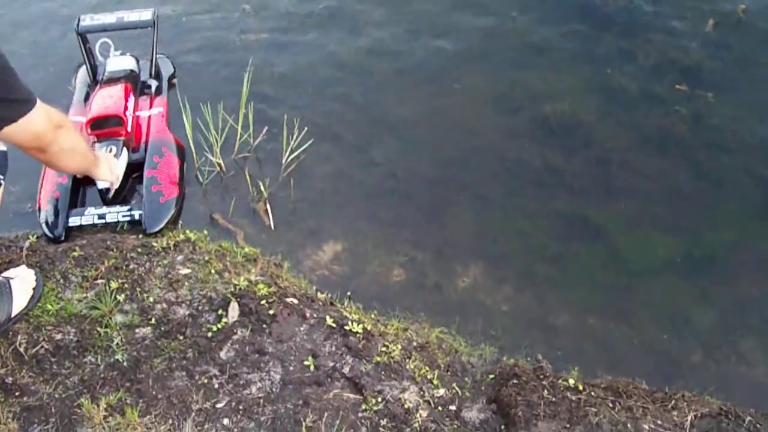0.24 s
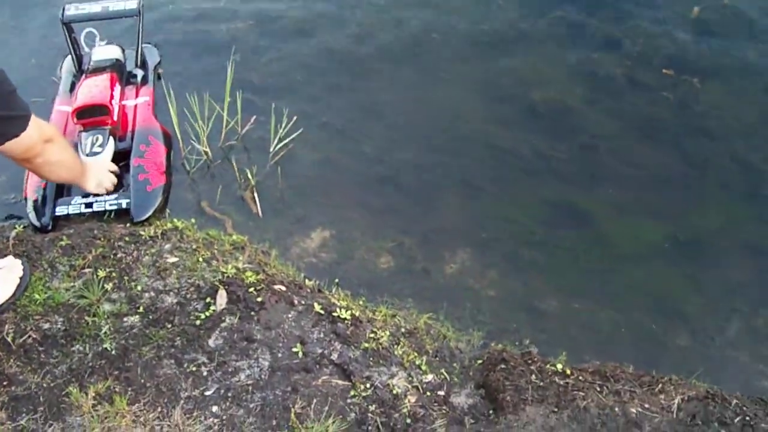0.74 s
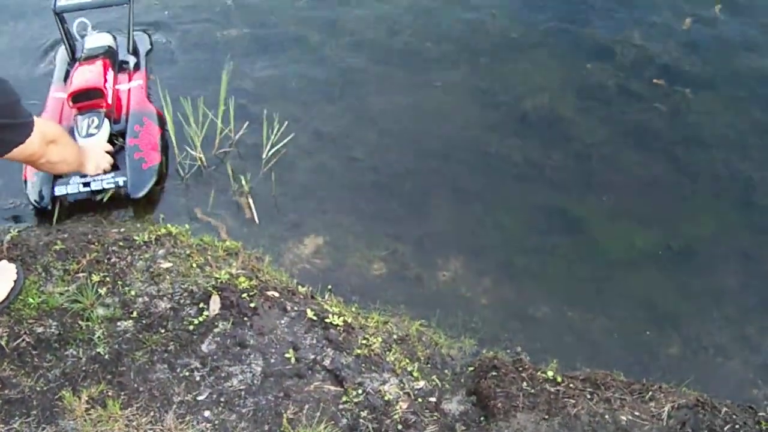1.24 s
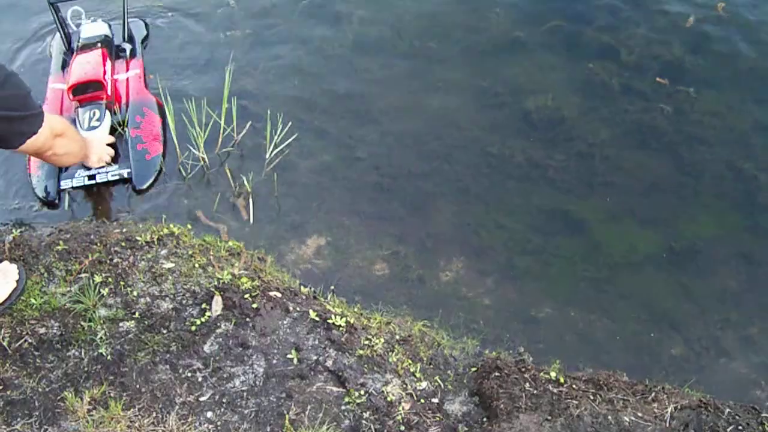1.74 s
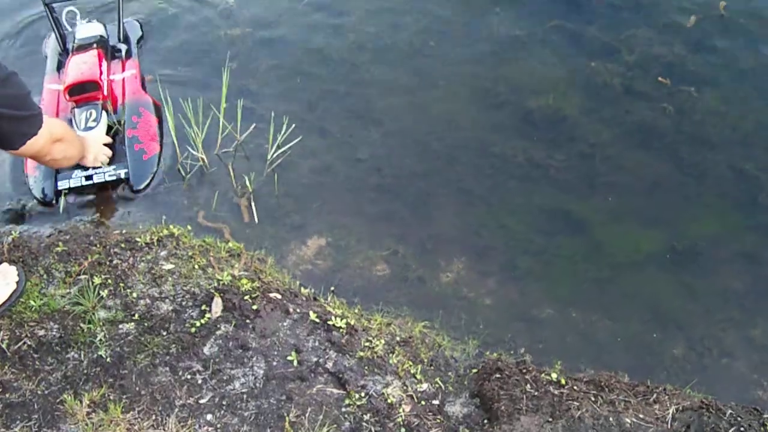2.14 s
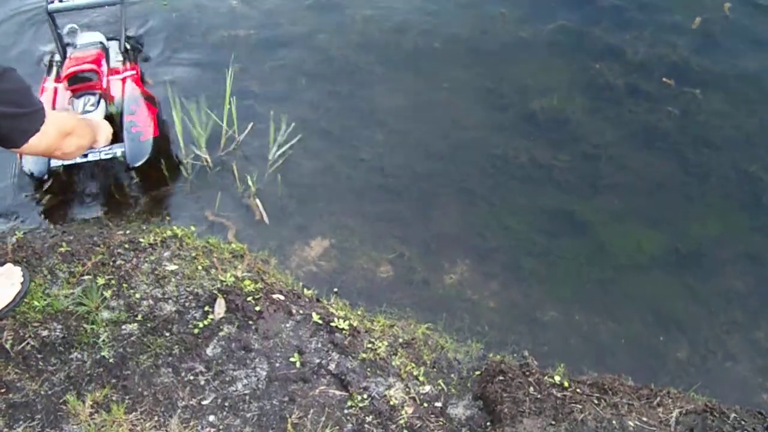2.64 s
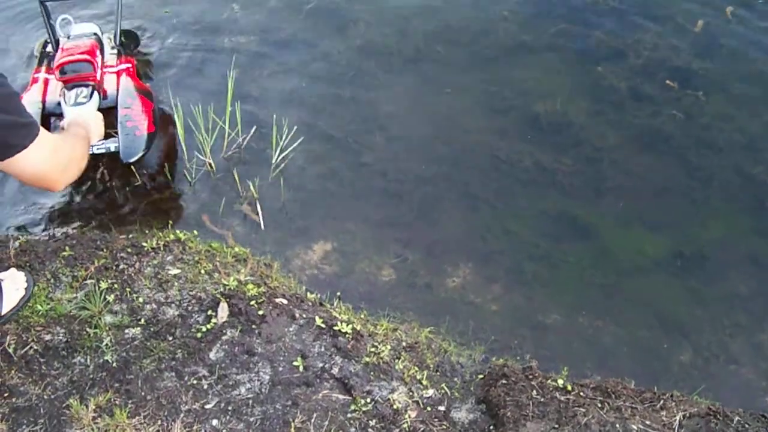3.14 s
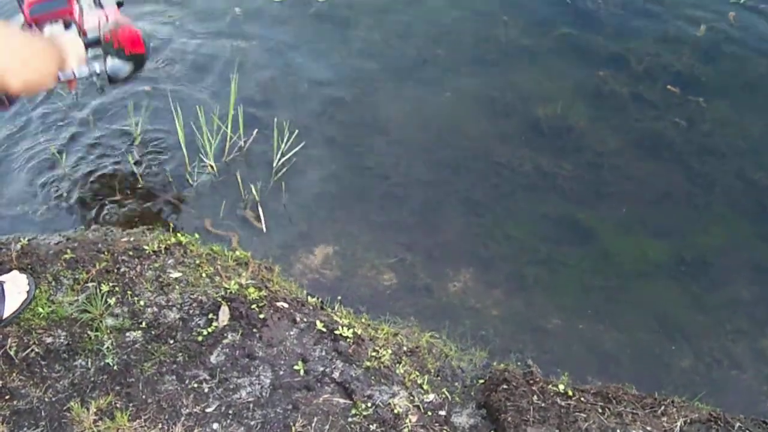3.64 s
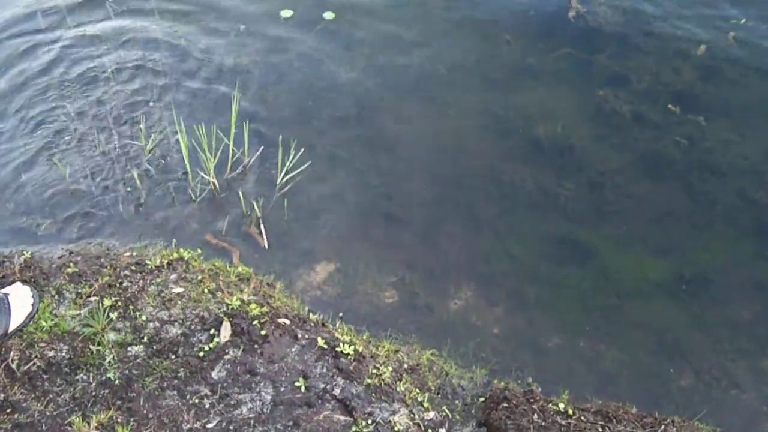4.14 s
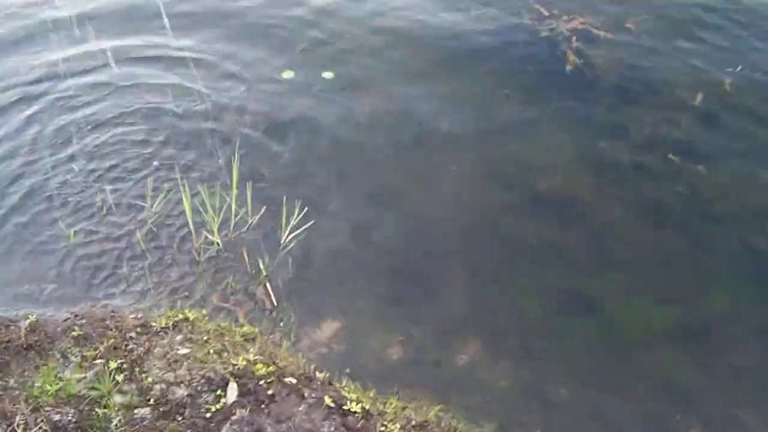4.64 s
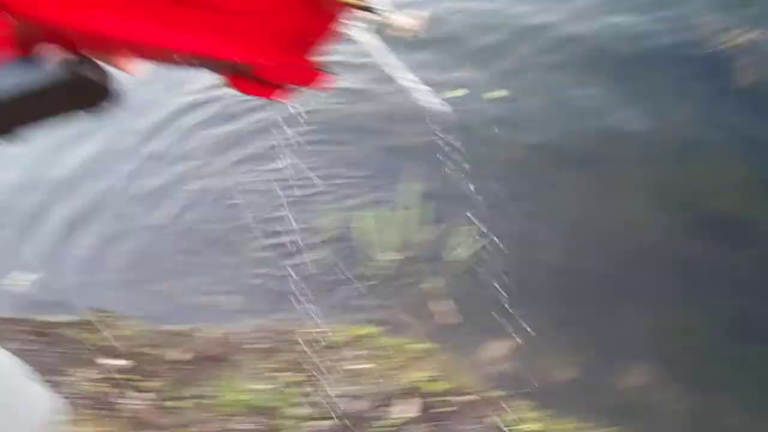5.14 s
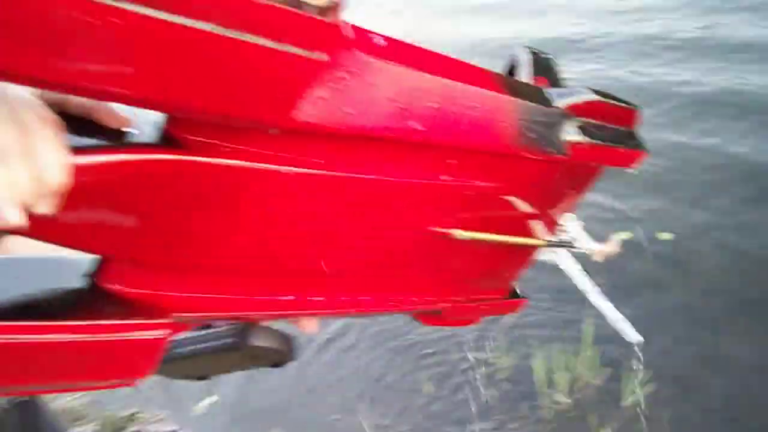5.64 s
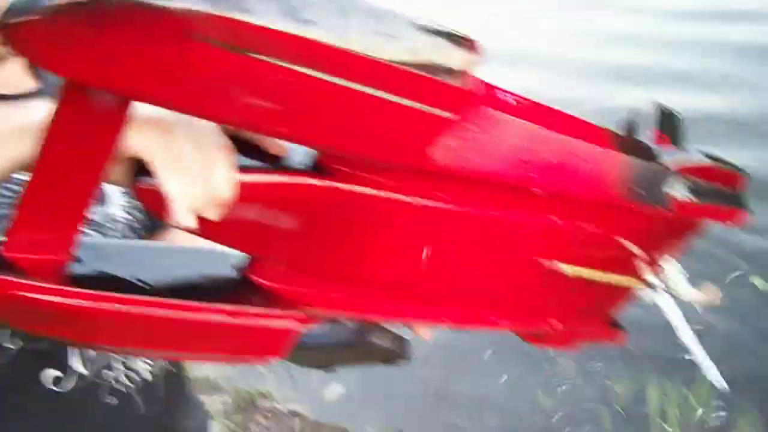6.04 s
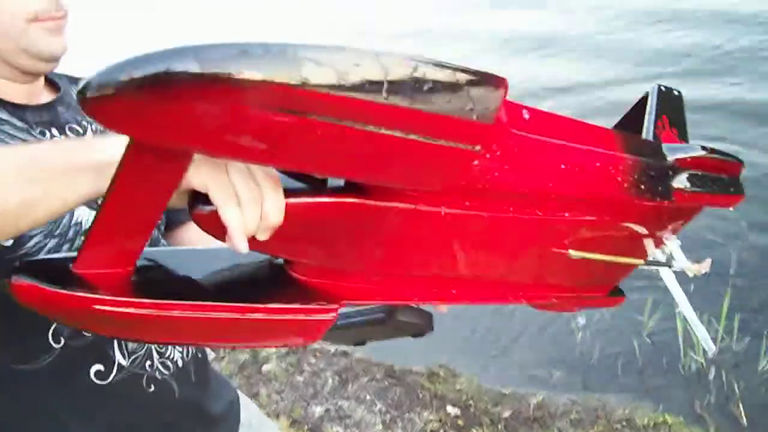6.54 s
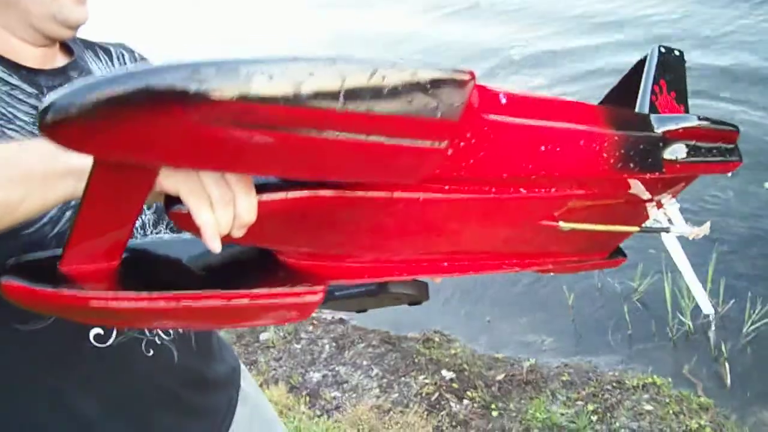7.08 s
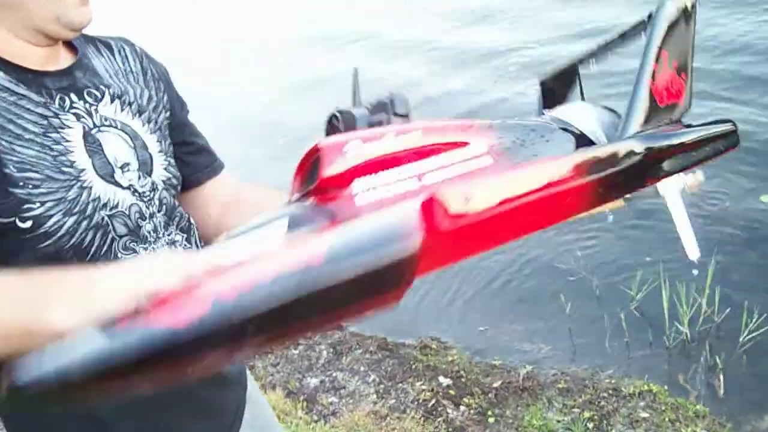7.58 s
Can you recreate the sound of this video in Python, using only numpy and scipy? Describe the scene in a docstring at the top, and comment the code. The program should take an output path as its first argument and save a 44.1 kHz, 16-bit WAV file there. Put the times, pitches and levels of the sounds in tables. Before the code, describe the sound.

Outdoors at a pond edge, a low rumble, broad airy wash and thin hiss run throughout, rising slightly, stronger on the left. A distant engine drones low and unsteadily, sagging near 0.4 and again from 3 to 3.4 seconds, then picking up and holding steadier from 4.4. Very faint hull ticks come at 0.3, 2.0 and 2.9. A clear, short, hollow plastic knock lands at 3.8, another hard left at 4.7. Sparse tiny drips thicken into a fine bright patter around 4.3 to 5.3. At 4.5 a heavy dull finger rub with scrape overloads the right side; everything ducks for about a second. Bumps hit at 4.8 and 5.0, a faint dull knock at 5.3, then small brushes and thumps from 5.8 to 6.2 and a faint one at 6.5. The right side, muffled meanwhile, clears by 6.3; rumble, engine and wash continue to 7.8.

```python
"""Pond side, outdoors: a model boat is lifted out; its hull knocks lightly and water trickles off it.
Knocks are decaying hull modes plus noise cracks; drops are short decaying tones.
A finger brushes (shaped noise) and bumps (pressure swings) the right microphone port.
Behind: a distant engine (wavering harmonics), a low rumble, a wide wash and a thin hiss (filtered noise).
A hard rub overloads the port; gain control then ducks everything for about a second."""
import sys
import numpy as np
from scipy import signal
from scipy.fft import rfft, irfft
from scipy.io import wavfile
from scipy.ndimage import uniform_filter1d, minimum_filter1d, map_coordinates

SR = 44100
rng = np.random.default_rng(int(sys.argv[2]) if len(sys.argv) > 2 else 0)


def unload_wav(signal):
    """Save mono or channel-first audio to the path in sys.argv[1] as 16-bit WAV at rate SR, clipped to [-1, 1]."""
    wavfile.write(
        sys.argv[1],
        SR,
        np.round(np.clip(np.atleast_2d(signal).T, -1, 1) * 32767).astype(np.int16),
    )


N = 344421
TIME = np.arange(N) / SR  # s
FREQ = np.maximum(np.arange(N // 2 + 1) * SR / N, 1)  # Hz

# light knocks on the hull: start_s, relative level_db, treble_tilt_db_per_octave, left_minus_right_db
KNOCKS = [(.266, -42, 4, -8.5), (2.045, -32, 1, -14), (2.927, -48, 4, -9), (3.7799, -17, -1.5, -3),
          (4.726, -17, -1, 17)]
# modes of the plastic hull: mode_hz, level_db, t60_s
HULL_MODES = [(386, -8, .04), (714, -13.5, 0.037), (1020, -3.5, 0.032), (1690, -2, 0.011), (3100, -7, .008),
              (5030, -3, .006), (7840, -17, 0.0065)]
# finger strokes over the right port, and one faint dull knock at 5.27 s:
# start_s, length_s, middle_rub_db, middle_scrape_db
STROKES_AND_KNOCK = [(4.46, 0.14, -40, -22), (4.506, 0.14, 3, -16.5), (4.815, 0.05, -11, -24.5),
                     (4.95, 0.13, -14.5, -30), (5.273, 0.027, -14.5, -34), (5.783, .038, -23, -34),
                     (5.882, 0.044, -21, -33), (5.969, 0.069, -10, -21), (6.003, 0.16, -21.5, -26.5),
                     (6.085, .03, -13.5, -14.5), (6.119, .06, -28, -28), (6.535, 0.074, -28, -26)]
# spectrum of the dull rub: freq_hz, relative density_db (per Hz)
RUB_COLOUR = [(20, -2), (60, 0), (180, -3.5), (380, -6.5), (750, -16), (1500, -27.5), (3000, -42),
              (8000, -63.5)]
# spectrum of the bright scrape: freq_hz, relative density_db (per Hz)
SCRAPE_COLOUR = [(100, -10.5), (600, 3.5), (1500, -1), (2600, -7.5), (4500, -16.5), (6500, -20),
                 (8200, -33)]
# finger bumps on the right port: centre_s, half_length_s, peak_db
BUMPS = [(4.835, 0.0034, 2.5), (5.004, 0.012, -10.5), (5.796, 0.0085, -9), (5.904, 0.0084, -8),
         (5.987, 0.0083, -8)]
# distant engine, easing off and picking up: time_s, mean firing_hz, level_db
ENGINE = [(0, 71.76, -30), (.4, 58.15, -32.5), (.65, 69.7, -34.5), (1.7, 70.1, -29), (2.3, 65.5, -28.5),
          (2.75, 65.25, -30), (3.05, 53, -31), (3.4, 57.04, -38), (3.8, 58.1, -27), (4.4, 64.9, -25.5),
          (7.1, 64.1, -25.5), (7.81, 64.1, -30)]
# engine harmonics: multiple of the firing rate, relative level_db
ENGINE_ORDERS = [(1, 1), (2, -8), (3, -13.5), (4, -18.5)]
# wash over time: time_s, level_db (before its edge filter), upper_edge_hz, crest_db under the edge
WASH = [(0, -34.5, 3900, 5.5), (.75, -32.5, 3850, -2.5), (1.2, -32, 4400, 6), (2.05, -33.5, 4996, 6.5),
        (2.3, -33, 4600, .5), (3.1, -31, 4600, -1.5), (4.4, -32, 3650, -0.5), (5.8, -31.5, 3130, 3),
        (6.9, -28, 3460, -1.5), (7.55, -29.5, 3207, -3), (7.8, -27, 3820, -2.5)]
# dip wandering through the wash: time_s, centre_hz
DIP = [(0, 2000), (2.2, 2030), (3.2, 2549), (5.8, 1950), (6.6, 2430), (7.5, 2850)]
# likeness of the two ports: freq_hz, shared power (0-1)
LIKENESS = [(60, 0.95), (250, 0.97), (500, 1), (1100, 0.73), (2200, 0.83), (4000, 0.95), (8000, 1)]
# spectra of the background noises before moving filters: freq_hz, relative density_db (per Hz)
RUMBLE_COLOUR = [(20, 0.5), (38, -1.5), (52, 3), (70, 0), (100, 3), (150, -4.5), (205, -2.5), (300, -8.5),
                 (420, -11.5), (900, -27)]
WASH_COLOUR = [(150, -18.5), (400, -9.5), (600, -5), (950, 0.5), (1200, -2), (1600, 0), (2500, -2.5),
               (3500, -15), (5000, -19.5), (8000, -36.5)]
HISS_COLOUR = [(1000, -3), (3500, 9.5), (4700, 7.5), (6000, 1.5), (7200, 0), (8200, -10.5)]

# water pours off around POUR_S, on top of steady drips
POUR_S, POUR_HALF_S, POUR_DROPS_PER_S, DRIP_DROPS_PER_S = 4.8, 0.45, 770, 8.2
# one pressure arch per contact; fade rate is for a 0 dB rub
ARCH_POWER, SCRAPE_FADE_DB_PER_S = 1.34, 152.5
# finger resting on the right port
COVER_FROM_S, COVER_UNTIL_S, SETTLE_S, LIFT_S = 4.55, 6.3, 0.12, 0.41
COVER_DB, COVER_HZ = -1, 1800
# rumble and hiss swell steadily from these starting levels
RUMBLE_DB, RUMBLE_RISE_DB_PER_S = -30, 0.7539
HISS_DB, HISS_RISE_DB_PER_S = -56.5, 0.93
# right port hears engine, rumble and wash later and weaker
PORT_LAG_MS, RIGHT_PORT_DB = 0.22, -3
TOP_HZ = 8450


def knocks(crack_db=-5, crack_s=0.0013, contact_s=0.0004):
    """Each tap rings the short hull modes and has a brief noise crack, louder with higher treble tilt."""
    out = np.zeros((2, N))
    t = TIME[:SR // 10]
    pivot_hz = HULL_MODES[3][0]
    onset = 1 - np.exp(-t / contact_s)
    for start_s, level_db, tilt_db, pan_db in KNOCKS:
        ring = np.zeros(len(t))
        for hz, mode_db, t60_s in HULL_MODES:
            phase = rng.uniform(0, 2 * np.pi)
            decay_db = mode_db + tilt_db * np.log2(hz / pivot_hz) - 60 * t / t60_s
            ring += undb(decay_db) * np.sin(2 * np.pi * hz * t + phase)
        crack = undb(crack_db + 2 * tilt_db) * np.exp(-t / crack_s) * rng.standard_normal(len(t))
        knock = undb(level_db) * onset * (ring + crack) / 2
        add(out, start_s, pan(knock, pan_db))
    return out


def trickle(drop_db=-52.5, spread_db=2, low_hz=3500, high_hz=8000, decay_cycles=3):
    """Small drops fall back on the pond at random, each a tick of a few cycles."""
    out = np.zeros((2, N))
    t = TIME[:SR // 100]
    pour = np.exp(-((TIME - POUR_S) / POUR_HALF_S) ** 2)
    drops_per_s = DRIP_DROPS_PER_S + POUR_DROPS_PER_S * pour
    starts_s = TIME[rng.random(N) < drops_per_s / SR]
    for start_s, (pitch, size, side) in zip(starts_s, rng.random((len(starts_s), 3))):
        turns = (low_hz + pitch * (high_hz - low_hz)) * t
        drop = np.exp(-turns / decay_cycles) * np.sin(2 * np.pi * turns)
        level_db = drop_db - spread_db * np.log(1 - size)  # few drops are loud
        add(out, start_s, pan(drop * undb(level_db), -8 * side))
    return out


def strokes_and_knock(grit_db=2.0, slip_db=0.5):
    """Skin sticks and slips over the port: uneven noise, heard as a dull rub and a brighter scrape.

    The scrape dies away as the skin flattens, faster the harder the press.
    One short burst of the same noise is a faint dull knock.
    """
    rub_gain, scrape_gain = np.zeros((2, N))
    for start_s, length_s, rub_db, scrape_db in STROKES_AND_KNOCK:
        from_middle_s = np.clip(TIME - start_s, 0, length_s) - length_s / 2
        pressure = np.abs(np.cos(np.pi * from_middle_s / length_s)) ** ARCH_POWER
        fade_db = SCRAPE_FADE_DB_PER_S * undb(rub_db) * from_middle_s
        rub_gain += pressure * undb(rub_db)
        scrape_gain += pressure * undb(scrape_db - fade_db)
    unevenness_db = grit_db * walk(1500) + slip_db * walk(160)
    friction = rng.standard_normal((2, N)) * undb(unevenness_db)
    rub = unit(shape(friction[0], undb(over_freq(RUB_COLOUR))))
    scrape = unit(shape(friction[1], undb(over_freq(SCRAPE_COLOUR))))
    return rub * rub_gain + scrape * scrape_gain


def bumps():
    """The fingertip pumps the air in the port: one slow swing of pressure each way."""
    out = np.zeros(N)
    for centre_s, half_s, peak_db in BUMPS:
        u = np.clip((TIME - centre_s) / half_s, -10, 10)
        out += undb(peak_db) * u * np.exp((1 - u ** 2) / 2)
    return out


def covered(x):
    """The resting finger muffles the port, then slowly lifts off it."""
    settling = (TIME - COVER_FROM_S) / SETTLE_S
    lifting = (COVER_UNTIL_S - TIME) / LIFT_S
    cover = np.clip(np.minimum(settling, lifting), 0, 1)
    muffled = shape(x, undb(COVER_DB) / np.sqrt(1 + (FREQ / COVER_HZ) ** 3))
    return x + cover * (muffled - x)


def engine(waver_db=2.3, wobble=0.0062):
    """Only the lowest harmonics carry this far; moving air makes each one waver."""
    firing_hz, level_db = curves(ENGINE)
    phase = 2 * np.pi * np.cumsum(firing_hz * (1 + wobble * walk(14))) / SR
    drone = np.zeros(N)
    for multiple, order_db in ENGINE_ORDERS:
        gain = undb(order_db + waver_db * walk(12))
        drone += gain * np.sin(multiple * phase + rng.uniform(0, 2 * np.pi))
    return unit(drone) * undb(level_db)


def rumble(like, flutter_db=0.8, mean_reach_hz=300, opening=0.82):
    """Low noise that reaches higher in pitch as it swells."""
    level_db = RUMBLE_DB + RUMBLE_RISE_DB_PER_S * TIME
    reach_hz = mean_reach_hz * undb(opening * (level_db - level_db.mean()))
    noise = moving_edge(coloured(RUMBLE_COLOUR, like), reach_hz, np.zeros(N), steep=4.65)
    return noise * undb(level_db + flutter_db * walk(9))


def wash(like, flicker_db=0.6):
    """Wide noise with a wandering dip and a moving upper edge."""
    level_db, edge_hz, crest_db = curves(WASH)
    noise = moving_edge(moving_dip(coloured(WASH_COLOUR, like)), edge_hz, crest_db)
    return noise * undb(level_db + flicker_db * walk(12))


def hiss(flicker_db=0.6):
    """Thin noise, independent at the two ports, swelling slowly."""
    level_db = HISS_DB + HISS_RISE_DB_PER_S * TIME
    noise = coloured(HISS_COLOUR) * undb(level_db + flicker_db * walk(20))
    return pan(noise, -1.3)


def outdoors():
    """Engine, rumble and wash come from the left, later and weaker at the right; hiss is all round."""
    like = np.clip(over_freq(LIKENESS), 0, 1)
    left, right = engine() + rumble(like) + wash(like)
    late = map_coordinates(right, [(TIME - PORT_LAG_MS / 1000) * SR], order=3)
    return np.array([left, undb(RIGHT_PORT_DB) * late]) + hiss()


def coloured(rows, like=0.0):
    """Noise of a given spectrum at the two ports; like is their shared part of the power."""
    noise = rng.standard_normal((3, N))
    gain = undb(over_freq(rows))
    shared = shape(noise[0], gain * np.sqrt(like))
    separate = shape(noise[1:], gain * np.sqrt(1 - like))
    return unit(shared + separate)


def moving_edge(x, edge_hz, crest_db, steep=13, crest_at=0.76, crest_octaves=0.35):
    """A slowly moving low-pass with a crest just under its edge."""
    hz, s, frames = signal.stft(x, SR, nperseg=1024)
    ratio = np.maximum(hz, 1)[:, None] / np.interp(s, TIME, edge_hz)
    bell = np.exp(-(np.log2(ratio / crest_at) / crest_octaves) ** 2)
    gain = undb(np.interp(s, TIME, crest_db) * bell) / np.sqrt(1 + ratio ** steep)
    return signal.istft(frames * gain, SR)[1][:, :N]


def moving_dip(x, depth_db=-4, octaves=0.14):
    """A narrow, shallow dip whose centre slides slowly."""
    hz, s, frames = signal.stft(x, SR, nperseg=1024)
    away_octaves = np.log2(np.maximum(hz, 1)[:, None] / np.interp(s, *np.transpose(DIP)))
    gain = undb(depth_db * np.exp(-(away_octaves / octaves) ** 2))
    return signal.istft(frames * gain, SR)[1][:, :N]


def undb(db):
    """Decibels to gain."""
    return 10 ** (np.asarray(db) / 20)


def unit(x):
    """Scale to rms 1."""
    return x / np.sqrt(np.mean(x ** 2))


def curves(rows):
    """Each column of a time table, joined by straight lines."""
    s, *columns = np.transpose(rows)
    return [np.interp(TIME, s, column) for column in columns]


def over_freq(rows):
    """A (Hz, value) table on a log-frequency axis."""
    hz, value = np.transpose(rows)
    return np.interp(np.log(FREQ), np.log(hz), value)


def shape(x, gain):
    """Filter by a gain for each frequency."""
    return irfft(rfft(x) * gain, N)


def walk(rate_hz):
    """Random levels held 1 / rate_hz s, then smoothed; rms 1."""
    k = int(SR / rate_hz)
    steps = np.repeat(rng.standard_normal(N // k + 1), k)
    return unit(uniform_filter1d(uniform_filter1d(steps, k), k)[:N])


def pan(x, left_minus_right_db):
    """Place a sound by its level difference."""
    return x * undb(np.array([[left_minus_right_db], [-left_minus_right_db]]) / 2)


def add(out, start_s, sound):
    """Mix a short stereo sound in."""
    i = int(start_s * SR)
    out[:, i:i + sound.shape[1]] += sound[:, :N - i]


def past(seconds):
    """Filter settings for a window over the moments just past."""
    half = int(seconds * SR / 2)
    return dict(size=2 * half + 1, origin=half, mode="nearest")


def scene():
    """The pond side, with the finger and the faint dull knock on the right port alone."""
    left, right = outdoors()
    contact = strokes_and_knock() + bumps()
    ports = np.array([left, covered(right) + contact])
    return ports + knocks() + trickle()


def record(dry):
    """Gain control drops on an overload, holds and recovers; peaks clip and the top is cut."""
    threshold_db, knee_db, deepest_db = -7.2, 1, -8.5
    sense_s, hold_s, release_s = 0.11, 0.84, 0.2
    power = uniform_filter1d(np.max(dry ** 2, axis=0), **past(sense_s))  # louder port
    over_db = 10 * np.log10(np.abs(power) + 1e-12) - threshold_db
    cut_db = deepest_db * np.clip(over_db / knee_db, 0, 1)
    held_db = minimum_filter1d(cut_db, **past(hold_s))
    gain_db = np.minimum(held_db, uniform_filter1d(held_db, **past(release_s)))
    clipped = np.clip(dry * undb(gain_db), -0.95, 0.95)
    low_pass = signal.ellip(10, 0.2, 80, TOP_HZ, fs=SR, output="sos")
    return signal.sosfilt(low_pass, clipped)


dry = scene()
out = record(dry)
unload_wav(out)
```